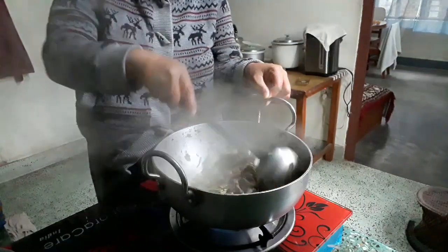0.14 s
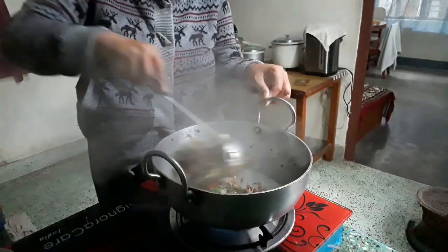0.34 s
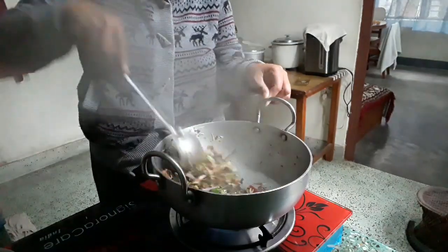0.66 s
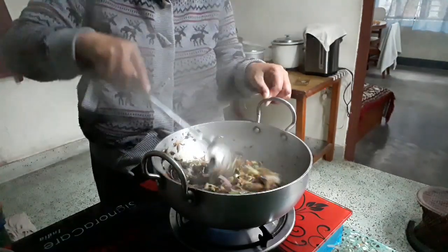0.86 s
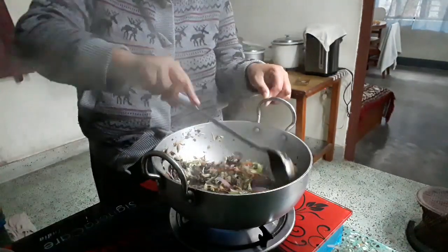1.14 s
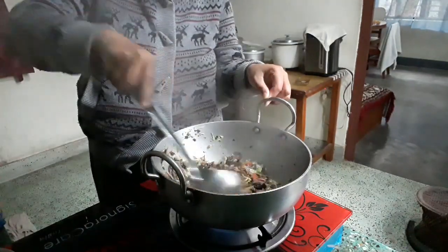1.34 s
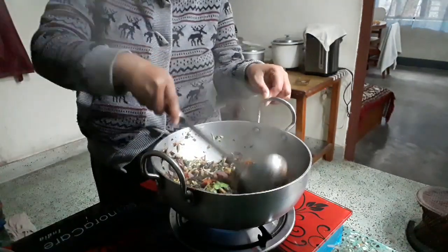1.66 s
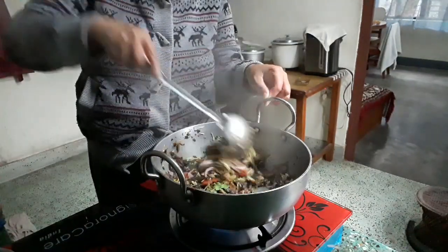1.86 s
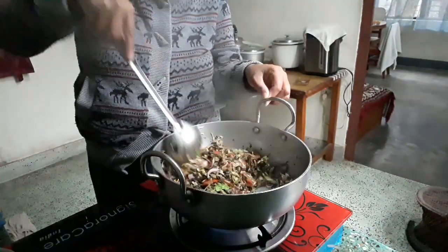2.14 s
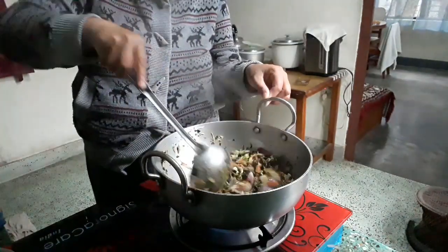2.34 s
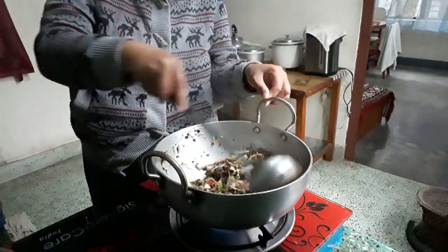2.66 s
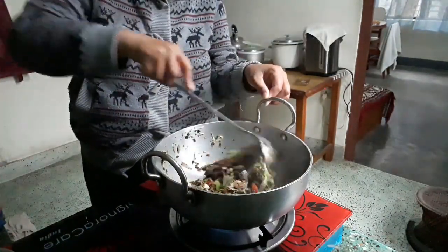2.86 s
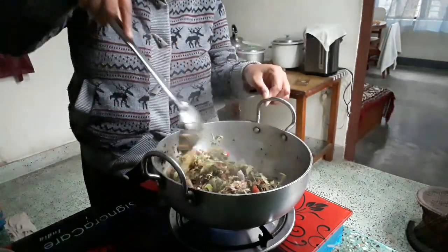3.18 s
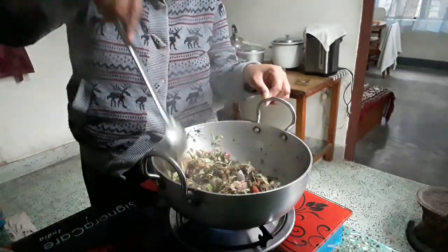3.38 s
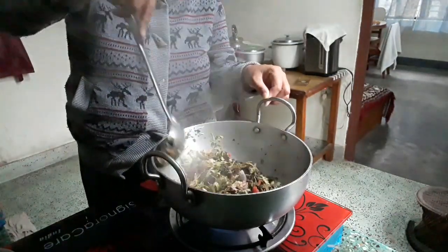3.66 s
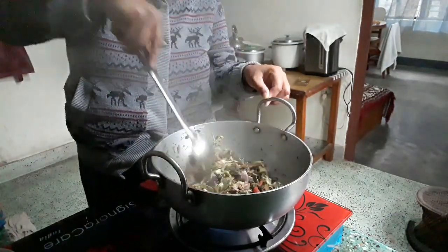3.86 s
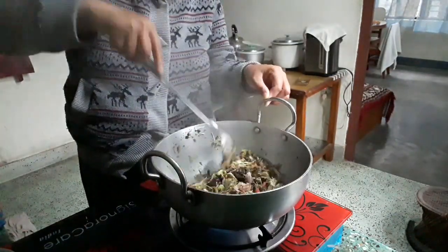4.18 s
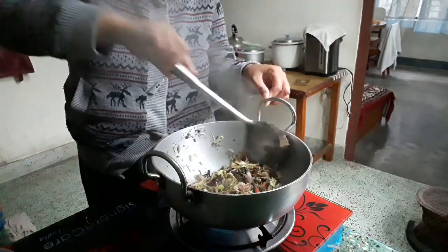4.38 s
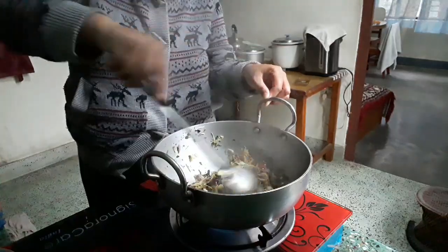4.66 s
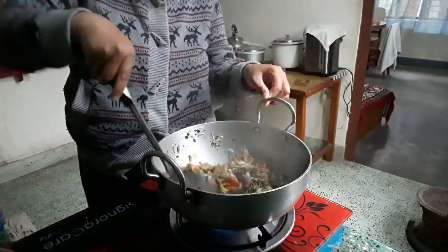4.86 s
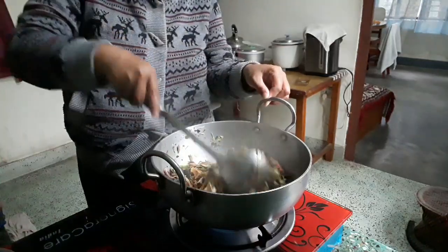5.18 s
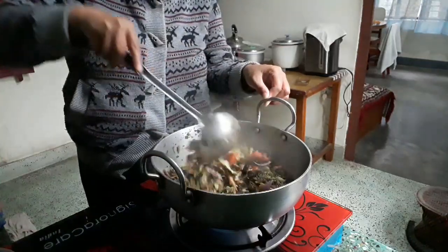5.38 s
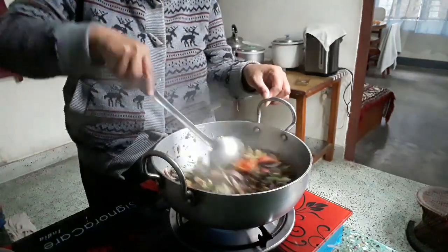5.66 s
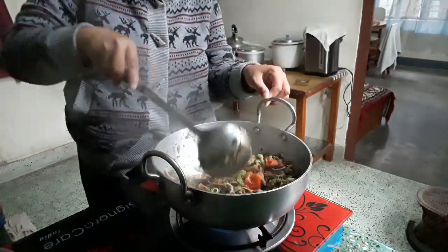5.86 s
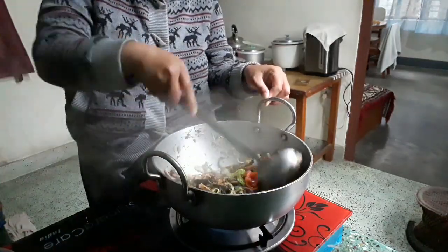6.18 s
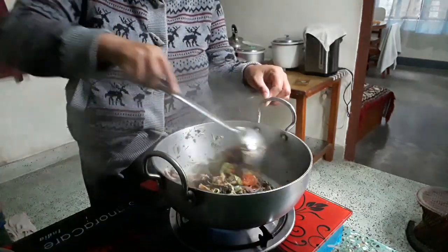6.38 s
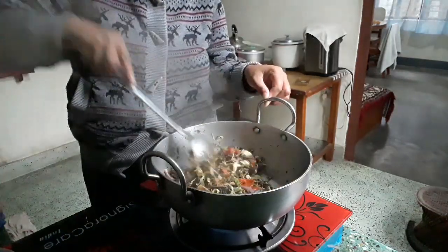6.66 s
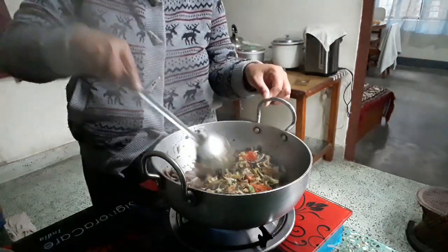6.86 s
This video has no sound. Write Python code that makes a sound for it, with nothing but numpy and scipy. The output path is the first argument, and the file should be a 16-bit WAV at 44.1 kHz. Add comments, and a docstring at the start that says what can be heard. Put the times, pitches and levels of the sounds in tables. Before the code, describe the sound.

A single close microphone hears a metal ladle stirring food in a deep, ringing pan. Strong bursts of steam hiss come early, then the frying quietens as scrapes, short squeaks and bright clanks take over. After a very brief silence there is another clank, a sharp knock and a fresh hiss, followed by lighter scraping, one last hard knock and a squeal. A gas flame rumbles softly in a small echoing kitchen.

```python
"""Vegetables sizzle in a deep metal pan on a gas ring, close to one microphone in a hard-walled kitchen.
At once a metal ladle knocks the pan and turns the food; each turn lays wet food on hot metal and the hiss swells.
Scrapes, short squeals and soft low thuds follow, with hard knocks near 2.6, 3.3, 4.1, 4.5 and 6.1 s.
Just before 4 s the sound cuts out briefly. Bursts of noise and clicks make the hiss and scrapes; decaying
sines make the ring of the pan. The flame rumbles under it all."""
import sys
import numpy as np
from scipy import signal
from scipy.fft import rfft, irfft
from scipy.io import wavfile

SR = 44100
rng = np.random.default_rng(int(sys.argv[2]) if len(sys.argv) > 2 else 0)


def generate_wav(sig):
    """Save sig (samples, or channels by samples) to the path in sys.argv[1] as 16-bit PCM at SR."""
    pcm = np.round(np.clip(np.atleast_2d(sig).T, -1, 1) * 32767).astype(np.int16)
    wavfile.write(sys.argv[1], SR, pcm)


N = 309582
TIME = np.arange(N) / SR
HZ = np.fft.rfftfreq(8192, 1 / SR)  # frequency axis of all colour curves

# Steady frying of the food that lies still: (time [s], level [dB])
SIMMER = [(0, -40), (1.8, -42.5), (3.1, -41.5), (4.6, -41.5), (5.45, -46), (6.1, -44.5), (7.0, -41.5)]
# Turns of the ladle that lay wet food on hot metal:
# (time [s], fresh contact [s], hiss level [dB], finest spray relative to the hiss [dB])
TURNS = [(0.0, 0.11, -32.5, -5.5), (0.328, .36, -39, -8), (0.66, .48, -36.5, -8), (1.14, 0.23, -32.5, -8),
         (2.0, 0.49, -42, -7), (2.31, 0.44, -37, -11), (2.56, .22, -40, -2), (3.36, 0.091, -40, -9),
         (4.62, 0.26, -35, -6), (6.59, 0.22, -41.5, -7)]
# Colour of the sizzle before the bowl: (frequency [Hz], level [dB per Hz])
SIZZLE_COLOUR = [(100, -22), (190, -6), (300, -6.5), (500, -2.5), (850, -2.5), (1000, -2.5), (1700, 2),
                 (2800, 0.5), (5000, -3), (8800, -2.5), (9500, -7.5), (11000, -9.5), (13000, -13.5),
                 (16000, -19.5)]
# Ladle knocks: (time [s], place 0-3 rounded to a PAN_MODES column, ring gain [dB], crack level [dB],
# clatter level [dB], clatter centre [Hz], lift at that centre [dB], clatter t60 at 2500 Hz [s], treble lift [dB])
KNOCKS = [(0.0003, 0, 1, -19.5, -26, 650, -3, 0.49, -1),
          (2.5882, 1.5, -4.5, -16, -25.5, 3520, 3.5, 0.36, 2),
          (3.328, 0, -5.5, -15, -29, 1890, 7.5, 0.44, 6),
          (3.344, -0.5, -12, -21.5, -28, 2000, -0.5, 0.24, 11),
          (4.1058, 1, 3.5, -34, -19, 1450, -0.5, 0.42, 2),
          (4.5076, 2, 1, -10.5, -17.5, 2400, 5.5, 0.32, -0.5), (4.651, 2, -18, -29, -36, 500, 10, 0.22, 14),
          (6.1227, 3, 3.5, -8.5, -18, 2600, 7.5, 0.44, 0)]
# Modes of pan and ladle: (frequency [Hz], level when struck on the bottom [dB], on the near wall [dB],
# on the far wall [dB], on the side [dB])
PAN_MODES = [(338.3, -38, -44, -43, -40.5), (434.5, -40.5, -37.5, -37, -54), (530, -41.5, -38, -33, -50),
             (625, -32.5, -39, -41, -46), (909, -31, -51, -29, -39), (1003, -48.5, -34, -32.5, -51),
             (1067, -42, -34.5, -37, -28.5), (1412, -30.5, -28.5, -36, -30.5), (1483, -39, -29, -44, -31),
             (1583, -37, -36, -41, -35), (1752, -42.5, -32, -33, -42), (1830, -38, -29, -36, -44),
             (1990, -30.5, -25, -23.5, -41), (2100, -36.5, -33.5, -27, -46), (2214, -34.5, -34, -31, -20),
             (2315, -38, -35, -23, -41), (2423, -38.5, -38, -23.5, -24.5), (2652, -44.5, -33.5, -25.5, -30),
             (2876, -33.5, -44, -31, -27.5), (3150, -43, -35, -34, -35), (3347, -41, -47, -27, -31),
             (3490, -46, -39, -31.5, -27), (3890, -37.5, -35.5, -40, -31), (5303, -45, -29, -36, -40),
             (5351, -40.5, -38, -47, -25.5), (5800, -44, -42, -48, -33), (6170, -33.5, -34.5, -28.5, -42),
             (6910, -41, -50, -34, -27), (7100, -45, -53, -45, -31), (8070, -50, -44, -51, -26.5),
             (8680, -40.5, -36, -44, -42), (9000, -43, -35, -49, -29), (12110, -53, -46, -58, -41),
             (13200, -57, -54, -60, -40)]
# Crowd of small, close modes that every knock wakes: (frequency [Hz], level [dB per Hz])
CLATTER_COLOUR = [(60, -20.5), (170, -7), (260, 1), (400, -4), (620, 3.5), (790, 0.5), (950, 0), (2100, -4),
                  (3500, -1), (4900, -4.5), (6400, -2.5), (8800, -4), (9500, -7), (16000, -16)]
# Ladle strokes along the bowl: (time of hardest pressure [s], length [s], level there [dB], rasp centre [Hz])
SCRAPES = [(0.027, 0.22, -29.5, 3970), (0.761, 0.33, -39.5, 1410), (1.646, .2, -32, 2700),
           (2.39, 0.14, -34, 4000), (2.664, .25, -33, 3400), (2.812, 0.15, -33, 5500),
           (3.817, .15, -31.5, 1120), (3.805, .09, -30, 7000), (4.651, 0.18, -38.5, 2200),
           (4.902, 0.31, -39, 1980), (5.141, 0.17, -38.5, 2200), (5.801, .32, -38.5, 2020),
           (6.06, 0.18, -44, 2000), (6.34, .16, -33.5, 5540), (6.392, .056, -35, 5000),
           (6.85, .3, -41, 1710)]
# Squeals where the ladle's edge catches: (time of hardest pressure [s], length [s], mean pitch [Hz], level [dB])
SQUEALS = [(1.644, .12, 1796, -36), (1.65, 0.17, 1120, -40), (2.819, 0.09, 1580, -42),
           (2.858, 0.072, 1790, -32), (3.344, 0.055, 2056, -31), (3.341, .05, 4400, -32),
           (3.797, 0.062, 2220, -29), (3.803, 0.084, 1687, -27), (3.816, .07, 2480, -32.5),
           (3.875, .08, 2440, -37.5), (4.35, .3, 6800, -45), (4.635, .12, 2240, -35.5),
           (4.855, 0.27, 6400, -42), (4.919, 0.29, 1718, -38.5), (6.341, .135, 2557, -34),
           (6.345, .16, 1480, -38), (6.36, .14, 3830, -46), (6.336, 0.079, 6000, -46), (6.8, .6, 6800, -49)]
# Soft low thuds: food shoved or dropped, or the pan rocking on the stove:
# (time of peak [s], level [dB], rise and equal fall [s], centre [Hz])
THUDS = [(0.189, -46.5, 0.096, 370), (0.57, -46, 0.15, 138), (0.76, -46.5, .12, 348), (1.62, -48, .15, 90),
         (2.04, -48, .09, 99), (2.331, -46.5, .1, 400), (2.829, -53, 0.12, 520), (3.83, -40, 0.068, 392),
         (4.543, -41, .06, 290), (4.672, -48, 0.089, 332), (5.15, -46, 0.15, 110), (6.08, -47, .15, 90),
         (5.761, -42, .1, 420), (6.272, -42, 0.066, 332), (6.5, -49, .15, 460), (6.84, -43, 0.11, 490)]
# Rumble of the gas flame: (frequency [Hz], level [dB per Hz])
FLAME_COLOUR = [(20, -16), (40, -17), (50, -26), (63, 2.5), (100, -3.5), (125, -0.5), (160, -5),
                (220, -9.5), (400, -22.5), (900, -74.5)]
# Resonances of the bowl, each source weighting the curve: (frequency [Hz], width [Hz], height [dB])
BOWL = [(338, 28, 6.5), (420, 12, 2.5), (565, 90, 7), (840, 71, -4), (1089, 46, 6.5), (1570, 130, 3),
        (2020, 270, 2.5), (3480, 170, 1.5), (4010, 130, 1.5), (6480, 330, 3), (7100, 300, 1),
        (8020, 400, -3), (8600, 500, 1.5), (9570, 500, -4)]
# Echoes off bowl, stove and cook, before their treble weighting: (delay [s], level [dB])
NEAR_ECHOES = [(.0019, -26), (.0043, -19.5), (.0071, -13.5), (0.0112, -18)]
# Decay of the kitchen's echoes: (frequency [Hz], t60 [s])
ROOM_DECAY = [(150, 0.48), (1000, 0.52), (4000, 0.25), (14000, 0.18)]
# The brief cut: (start [s], end [s])
DROPOUT = (3.9552, 4.094)

FLARE_RISE_S, FLARE_FADE_S = 0.08, 0.13  # the hiss builds as food spreads, and dies as its water boils off
SIMMER_BUBBLING_DB, SIMMER_SPRAY_DB = -0.1, -8  # low bubbling and finest spray, relative to the hiss
FLARE_BUBBLING_DB = -6  # fresh contact makes finer bubbles
PRESS_SHARE, PRESS_CURVE = 0.38, 1.17  # share of a stroke spent bearing down, and how peaked the pressure is
BAND_LIMIT_HZ = 16000


def sizzle(hiss_db=-1.3, spit_db=-13, flutter_db=0.5, swell_db=0.36):
    """Steam bubbles burst into a hiss; hundreds of uneven larger spits a second crackle and the walls answer."""
    simmer = amp(np.interp(TIME, *np.transpose(SIMMER))) ** 2
    flare, flare_spray = flares()
    hiss = simmer + flare
    bubbling = simmer * amp(SIMMER_BUBBLING_DB) ** 2 + flare * amp(FLARE_BUBBLING_DB) ** 2
    spray = simmer * amp(SIMMER_SPRAY_DB) ** 2 + flare_spray

    spits = kitchen(pops(N, 700, 3.2), -3.5)
    bursts = amp(hiss_db) * pops(N, 40000, 0.41) + amp(spit_db) * spits
    spectrum = rfft(colour(bursts, read(SIZZLE_COLOUR, HZ) + bowl_db()))
    hz = np.fft.rfftfreq(N, 1 / SR)

    # large bubbles sound low, fine spray high
    low = read([(2500, 1), (4500, 0.048)], hz)
    high = read([(8000, 0), (11500, 1)], hz)
    middle = 1 - low - high
    # (crossfade, core band that sets the level [Hz], power over time)
    sizes = [(low, (900, 3000), bubbling),
             (middle, (4000, 9000), hiss),
             (high, (10000, 16000), spray)]
    out = np.zeros(N)
    for share, (lo, hi), power in sizes:
        core = spectrum[(hz > lo) & (hz < hi)]
        core_rms = np.sqrt(2) * np.linalg.norm(core) / N
        out += np.sqrt(power) * irfft(spectrum * share, N) / core_rms
    return out * amp(flutter_db * drift(N, 35) + swell_db * drift(N, 8))


def flares():
    """Power of the extra hiss and of its finest spray: after each turn it builds, holds and boils off."""
    hiss, spray = np.zeros(N), np.zeros(N)
    for s, contact_s, db, spray_db in TURNS:
        rise = 1 - np.exp(-np.maximum(TIME - s, 0) / FLARE_RISE_S)
        fade = np.exp(-np.maximum(TIME - s - contact_s, 0) / FLARE_FADE_S)
        hiss += (amp(db) * rise * fade) ** 2
        spray += (amp(db + spray_db) * rise * fade) ** 2
    return hiss, spray


def knocks(crack_s=0.0059, treble_life=0.8, contact_db=5):
    """Each blow: a crack of metal on metal, a clatter of close modes, and the pan's clear ring."""
    t, clear, rough = TIME[:SR // 2], np.zeros(N), np.zeros(N)
    # the hard edge stresses the upper mids
    edge_db = contact_db * hump(HZ, 3700, 0.57) + read([(400, -5.5), (2000, 6)], HZ)
    treble_tilt = read([(2500, 0.12), (5000, 0.84)], HZ)
    for s, place, ring_db, crack_db, clatter_db, centre_hz, lift_db, t60, treble_db in KNOCKS:
        tone_db = read(CLATTER_COLOUR, HZ) + clusters_db(place)
        tone_db += lift_db * hump(HZ, centre_hz, 0.87) + treble_db * treble_tilt

        crack = colour(rng.standard_normal(len(t)), tone_db + edge_db) * np.exp(-(t / crack_s) ** 2)
        crack = unit(crack) * np.sqrt(crack_s / 2 / t[-1])  # energy follows the crack's short length

        decay = [(300, 1.25 * t60), (2500, t60), (12000, treble_life * t60)]
        clatter = die_away(colour(rng.standard_normal(len(t)), tone_db), decay)

        add(rough, s, amp(crack_db) * crack + amp(clatter_db) * clatter)
        add(clear, s, amp(ring_db) * ring(place))
    return rough + kitchen(clear, -11.5)


def ring(place, t60=0.26, waver_turns=0.069):
    """The modes after one tap; the ladle stays in touch and makes each one waver (both set at 2 kHz)."""
    t = TIME[:SR // 3]
    hz, level_db = modes(place)
    decay = np.exp(-np.log(1000) * t / (t60 * (hz / 2000) ** -0.1))
    wander = np.array([drift(len(t), 150) for _ in hz])
    waver = wander * waver_turns * np.sqrt(hz / 2000)
    turns = hz * t + waver + rng.random(hz.shape)
    return (amp(level_db) * decay * np.sin(2 * np.pi * turns)).sum(0)


def modes(place):
    """Frequencies and levels of the modes for one place of contact, as columns."""
    table = np.array(PAN_MODES)
    return table[:, 0, None], table[:, 1 + int(round(place)), None]


def clusters_db(place, lift_db=11, width_hz=130):
    """Small modes crowd round the strong ones, more widely at high pitch."""
    hz, level_db = modes(place)
    bells = 1 / (1 + (2 * (HZ - hz) / (width_hz * np.sqrt(hz / 2000))) ** 2)
    power = amp(level_db - level_db.max() + lift_db) ** 2
    return 10 * np.log10(1 + (power * bells).sum(0))


def scrapes(focus_db=15, ring_db=-8):
    """The ladle's edge sticks and slips: ragged clicks shake the pan, and at times lock into short squeals."""
    out, tap = np.zeros(N), ring(0)
    body_db = read(CLATTER_COLOUR, HZ) + 0.71 * bowl_db()
    for peak, length, rasp_db, centre_hz in SCRAPES:
        start, pressure = stroke(peak, length)
        slips = pops(len(pressure), 4000, 0.93) * amp(2 * drift(len(pressure), 150))
        rasp = colour(slips, body_db + focus_db * hump(HZ, centre_hz, 0.94))
        shaken = unit(signal.fftconvolve(rasp, tap)[:len(pressure)])
        add(out, start, pressure * amp(rasp_db) * unit(rasp + amp(ring_db) * shaken))
    for peak, length, hz, db in SQUEALS:
        start, pressure = stroke(peak, length)
        add(out, start, pressure * amp(db) * squeal(hz, len(pressure)))
    return kitchen(out, -10.5)


def stroke(peak, length):
    """Start time and pressure of a stroke: the hand bears down, then eases off."""
    start = peak - PRESS_SHARE * length
    heard_from = max(start, 0)
    t = heard_from + TIME[:2 * SR // 3]
    return heard_from, np.interp(t, [start, peak, start + length], [0, 1, 0]) ** PRESS_CURVE


def squeal(hz, length, wander_hz=38):
    """One resonance of the ladle, kept going by uneven slips (wander set at 2 kHz)."""
    pitch = hz + wander_hz * (hz / 2000) ** 0.63 * drift(length, 500)
    tone = np.sin(2 * np.pi * np.cumsum(pitch) / SR)
    return unit(tone * amp(5.6 * drift(length, 260)))


def soft_thuds(focus_db=30):
    """Soft low thuds: food shoved or dropped, or the pan rocking on the stove, as swells of low-pitched clicks."""
    out = np.zeros(N)
    body_db = 2 * bowl_db() + read([(900, -1), (5000, -26)], HZ)
    for s, db, length, centre_hz in THUDS:
        swell = np.cos(np.pi / 2 * np.clip(TIME[:SR // 2] / length - 1, -1, 1)) ** 2
        bumps = colour(pops(SR // 2, 500, 2.2), body_db + focus_db * hump(HZ, centre_hz, 0.66))
        add(out, s - length, amp(db) * swell * bumps)
    return kitchen(out, -8.5)


def burner(flame_db=-51, flutter_db=1.1, flutter_per_s=5, hum_hz=100, hum_db=-59):
    """The gas flame rumbles and flutters over a faint mains hum."""
    rumble = colour(rng.standard_normal(N), read(FLAME_COLOUR, HZ))
    flame = rumble * amp(flame_db + flutter_db * drift(N, flutter_per_s))
    return flame + amp(hum_db) * unit(np.sin(2 * np.pi * hum_hz * TIME))


def bowl_db():
    """The bowl colours what sounds inside it; nearby surfaces mirror mostly the treble and comb it."""
    resonances = sum(db / (1 + (2 * (HZ - hz) / width) ** 2) for hz, width, db in BOWL)
    mirrored = sum(amp(db) * np.exp(-2j * np.pi * HZ * delay) for delay, db in NEAR_ECHOES)
    treble_weight = read([(700, 0.13), (2500, 0.59)], HZ)
    return resonances + 20 * np.log10(abs(1 + mirrored * treble_weight))


def kitchen(x, wet_db):
    """Adds dense wall echoes that start after a 4 ms gap."""
    echoes = die_away(rng.standard_normal(SR // 2), ROOM_DECAY) * (TIME[:SR // 2] > 0.004)
    wet = signal.fftconvolve(x, echoes / np.linalg.norm(echoes))[:N]
    return (x + amp(wet_db) * wet) / np.hypot(1, amp(wet_db))


def die_away(x, t60s):
    """Lets each frequency decay at its own speed."""
    hz, t, z = signal.stft(x, SR, nperseg=256)
    decay = amp(-60 * t / read(t60s, hz)[:, None])
    return signal.istft(z * decay, SR, nperseg=256)[1][:len(x)]


def pops(length, per_s, spread_db):
    """Random clicks, many small and a few large; rms 1."""
    size = amp(spread_db * np.minimum(rng.exponential(1, length), 5)) * rng.choice([-1, 1], length)
    return unit(size * (rng.random(length) < per_s / SR))


def drift(length, per_s):
    """A smooth random wander of rms 1, turning per_s times a second."""
    knots = rng.standard_normal(8192)
    return unit(np.interp(np.arange(length) * per_s / SR, np.arange(len(knots)), knots))


def colour(x, db):
    """Filters by a dB curve given on HZ; rms 1."""
    gain = amp(np.interp(np.fft.rfftfreq(len(x), 1 / SR), HZ, db))
    return unit(irfft(rfft(x) * gain, len(x)))


def hump(hz, centre_hz, octaves):
    """A bell of height 1 on a log-frequency axis."""
    return np.exp(-0.5 * (np.log2((hz + 1) / centre_hz) / octaves) ** 2)


def read(points, hz):
    """Joins (frequency [Hz], value) points on a log-frequency axis."""
    f, value = np.transpose(points)
    return np.interp(np.log(hz + 1), np.log(f + 1), value)


def add(mix, s, sound):
    """Lays a sound into the mix at s seconds, or at the start if s is negative."""
    part = mix[max(round(s * SR), 0):][:len(sound)]
    part += sound[:len(part)]


def unit(x):
    """Scales to rms 1."""
    return x / np.sqrt(np.mean(x ** 2) + 1e-20)


def amp(db):
    """Decibels to gain."""
    return 10 ** (np.asarray(db) / 20)


def scene():
    """All sources reach one microphone, so both channels are alike."""
    mono = sizzle() + knocks() + scrapes() + soft_thuds() + burner()
    return np.array([mono, mono])


def record(dry):
    """Peaks bend softly under a ceiling, the sound cuts out once, and a low-pass limits the band."""
    ceiling = 0.9  # of full scale
    limited = dry / (1 + (dry / ceiling) ** 6) ** (1 / 6)
    live = (TIME < DROPOUT[0]) | (TIME > DROPOUT[1])
    low_pass = signal.firwin(511, BAND_LIMIT_HZ, window=("kaiser", 9), fs=SR)
    return signal.oaconvolve(limited * live, low_pass[None], "same")


dry = scene()
out = record(dry)
generate_wav(out)
```